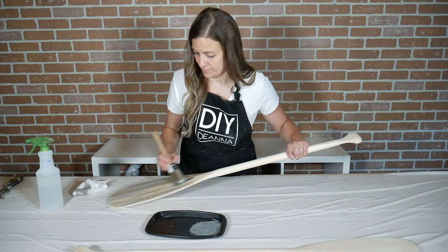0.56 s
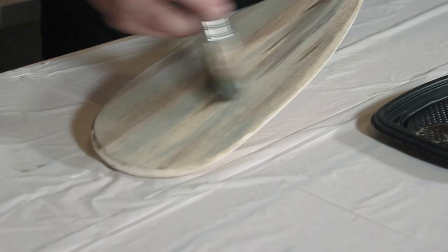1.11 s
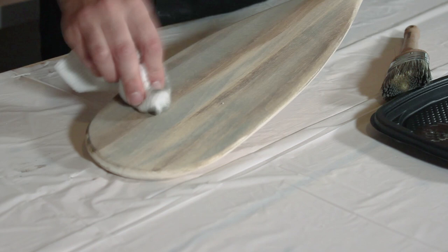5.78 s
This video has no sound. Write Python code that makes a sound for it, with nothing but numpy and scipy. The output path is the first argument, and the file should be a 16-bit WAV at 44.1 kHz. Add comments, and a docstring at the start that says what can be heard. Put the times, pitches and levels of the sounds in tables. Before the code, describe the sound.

In a quiet hard-walled room with a low air hum, a bristle brush makes short, faint swishes on a thin wooden board. The handle is put down with one sharp, loud wooden clack, followed by tiny ticks and low table rumble, and a firm thump comes a second later. A rag then wipes the board in quick, overlapping scratchy strokes until the end. Close microphone, nearly mono.

```python
"""A bristle brush, and later a rag, rub a thin wooden board: dense random slips excite its resonances.
The brush handle clacks on the table, the board bumps it, and small hard things tick: short contact
forces drive decaying sines. The table rocks with lumpy low noise, and air hums under a faint hiss.
A hard-walled room adds a noise-like tail; a faint unlike part separates two nearly equal channels."""
import sys
import numpy as np
from scipy import signal
from scipy.fft import rfft, irfft
from scipy.io import wavfile
from scipy.ndimage import uniform_filter1d

SR = 44100
rng = np.random.default_rng(int(sys.argv[2]) if len(sys.argv) > 2 else 0)


def wav_record(signal):
    """Record a signal, one row per channel, as 16-bit PCM in the file named by sys.argv[1]."""
    frames = np.transpose(np.atleast_2d(signal))
    bounded = np.clip(frames, -1, 1)
    # unit amplitude maps onto the largest positive 16-bit level
    quanta = np.round(bounded * 32767).astype(np.int16)
    wavfile.write(sys.argv[1], SR, quanta)


N = 326781

# spectrum of the air hum: f/Hz, relative level per Hz/dB
AIR_COLOUR = [(12, -26), (20, -2.5), (172, -5), (301, -10.5), (367, -16), (485, -8.5), (624, -20),
              (849, -17), (923, -16.5), (1220, -21.5), (1330, -19), (1440, -23), (6910, -34.5),
              (13200, -34.5), (16000, -44)]
# resonances added to the air hum: f/Hz, width/Hz, height/dB
AIR_MODES = [(110, 4.7, 6.5), (168, 9.5, 5.5), (289, 26, 3), (459, 120, -0.5), (926, 40, 5)]
# spectrum of the hiss: f/Hz, relative level per Hz/dB
HISS_COLOUR = [(12, -33), (20, 5), (43, -25.5), (150, 2), (193, -14), (285, -4.5), (558, -6.5),
               (1260, -11.5), (7520, -13.5), (16000, -15.5)]
# brush strokes: t of top speed/s, length/s, scratch level/dB, extra bristle hiss/dB, extra board body/dB
BRUSH_STROKES = [(0.09, 0.25, -74.5, 6.5, 7.5), (0.29, 0.39, -75, 5, 8.5), (0.705, 0.15, -71.5, 2.5, -7),
                 (1.145, 0.34, -68, -1, -6), (1.641, 0.22, -69.5, -4.5, -4), (1.994, 0.18, -61, -4, -13),
                 (2.28, 0.2, -63.5, -1.5, -5.5), (2.516, 0.18, -74.5, 0, 6)]
# spectrum of the brush scratch: f/Hz, relative level per Hz/dB
BRUSH_COLOUR = [(290, -26), (500, 2), (988, -6), (1320, -4.5), (1980, -11), (2130, -2.5), (2330, -7.5),
                (4400, -13), (6610, -13.5), (12300, -12.5), (16000, -22)]
# resonances of the board: f/Hz, width/Hz, height before the source's ring factor/dB
BOARD = [(920, 210, 0.5), (1420, 48, 8), (2280, 240, 4), (2990, 210, 2.5), (3224, 230, 3.5),
         (3744, 150, 4.5), (4346, 130, 5.5)]
# frequency response of the unlike part: f/Hz, side minus mid level before source weights/dB
WIDTH = [(60, -33.5), (200, -31.5), (700, -23.5), (1300, -24.5), (2400, -21), (4400, -18), (8100, -16.5),
         (15000, -14)]
# decay of the room: f/Hz, t60/s
ROOM_DECAY = [(100, 0.25), (250, 0.26), (500, 0.45), (1000, 0.41), (2000, 0.6), (4000, 0.43), (8000, 0.6),
              (15000, 0.066)]
# small hard things touching: t/s, peak level/dB, low ring f/Hz, high ring f/Hz,
# high ring level relative to low/dB, t60 before a cap/s
TICKS = [(2.678, -55, 2540, 4100, 11, 0.017), (2.829, -48, 1720, 3030, -6, 0.012),
         (2.844, -30.5, 1406, 2410, -4, 0.01), (3.1796, -33, 1280, 3950, 0, 0.0069),
         (3.2531, -32, 1706, 3400, -15, 0.0048), (7.0023, -39, 1330, 2160, -6, 0.019)]
# rocking of the table: t of top/s, swelling time/s, fading time/s, level at top/dB
SHAKE = [(2.83, 0.02, 0.054, -48), (2.895, .04, .12, -45.5), (3.035, .05, 0.17, -52),
         (3.264, 0.035, 0.021, -53.5), (3.335, 0.029, 0.16, -52), (3.874, 0.04, .12, -65.5),
         (4.305, 0.11, 0.028, -55.5), (6.9, 0.14, .2, -60), (7.17, .06, .05, -54.5),
         (7.3, 0.096, 0.07, -54.5)]
# spectrum of the rocking: f/Hz, relative level/dB
SHAKE_COLOUR = [(15, -27.5), (30, 2.5), (62, -3), (90, 3), (150, -41.0), (400, -54)]
# board bumping the table: t/s, swing peak level/dB, contact time/ms, room send relative to the bump/dB
BUMPS = [(2.831, -49, 1.33, 13.5), (3.334, -43, 2.5, 5), (3.3872, -28.5, 1.52, -3), (3.8701, -13, 1.7, -5)]
# modes of the table top: f/Hz, level relative to the swing peak/dB, t60/s
TABLE = [(110.7, -24.5, 0.55), (206, -14.5, 0.1), (325, -8, 0.074), (567, -23, 0.033), (782, -14.5, 0.33)]
# repeats of each bump through the table top: delay/ms, relative level/dB
ECHOES = [(4.8, -11), (6.6, -14.5), (9.6, -5.5), (13.2, -21.5), (16.5, -22), (21.0, -12.5)]
# handle dropped on the table: t/s, peak level/dB, room level before a 21 dB lift/dB
CLACK = (2.8853, -0.35, -11)
# modes of the handle: f/Hz, relative level/dB, t60/s
HANDLE = [(180, -34, 0.019), (280.7, -19.5, 0.027), (486, -9, 0.03), (670, -2, 0.018), (970, -7.5, 0.024),
          (1148, -3, 0.018), (1836, -11, 0.022), (2130, -12, 0.019), (3290, -7.5, 0.019), (4100, -10, .011)]
# spectrum of the splintery crack: f/Hz, relative level/dB
CRACK = [(300, -27), (1000, -18), (2600, -7), (3700, 5), (4600, -14.5), (6500, -12.5), (9000, -25.5),
         (12000, -30.5), (16000, -33.5)]
# what the clack leaves in the room: f/Hz, relative level per Hz/dB
CRASH = [(50, -36.5), (90, -19.5), (180, -4.5), (390, -10.5), (780, -2), (950, -2), (1400, -7.5),
         (2100, -15.5), (2750, -24), (3300, -18.5), (4200, -18.5), (4800, -30), (7000, -34.5),
         (10700, -45.5), (16000, -64.5)]
# the rag drops onto the board: t of top speed/s, speeding up/s, slowing down/s, scratch level/dB, brightness/dB
RAG_LANDS = (3.395, .03, .045, -66, 3)
# rag wipes: t of top speed/s, speeding up/s, slowing down/s, scratch level/dB, brightness/dB
RAG_WIPES = [(3.84, 0.14, 0.056, -56, 0), (3.98, 0.12, .1, -58, -0.5), (4.13, 0.053, .12, -58.5, -1),
             (4.39, 0.15, 0.11, -57.5, -1), (4.62, .11, .13, -56.5, 0), (4.87, .11, 0.16, -58.5, -1),
             (5.12, 0.085, 0.18, -59, -0.5), (5.57, .15, .12, -59.5, 0.5), (5.785, 0.076, 0.14, -60, 2),
             (6.03, 0.042, 0.043, -67.5, -0.5), (6.15, 0.063, 0.058, -62, 3), (6.36, 0.13, .15, -59.5, -1),
             (6.53, .13, 0.073, -60.5, 0.5), (6.78, 0.048, 0.053, -62, 1),
             (6.905, 0.063, 0.062, -60.5, -1.5), (7.03, .045, 0.1, -58, -3.5),
             (7.195, 0.053, 0.1, -59, -0.5), (7.29, 0.064, 0.05, -62.5, 10), (7.37, .05, .12, -70, 4)]
# spectrum of the rag scratch: f/Hz, relative level per Hz/dB
RAG_COLOUR = [(290, -48), (500, -11), (718, -7.5), (784, -6.5), (1320, -2), (1670, -2), (3150, -5),
              (5310, -10.5), (12100, -15.5), (14900, -21), (16000, -34)]


def gain_of(db):
    """Definition of the decibel: amplitude ratio from a level."""
    return 10 ** (np.asarray(db) / 20)


def evened(x):
    """Normalization to unit root mean square."""
    return x / np.sqrt(np.mean(np.abs(x) ** 2) + 1e-20)


def read(points, hz):
    """Linear interpolation along a logarithmic frequency axis."""
    f, value = np.transpose(points)
    return np.interp(np.log(hz + 1), np.log(f + 1), value)


def peaked(modes, hz):
    """Resonance: bell-shaped level peaks in dB, summed over the modes."""
    return sum(db / (1 + (2 * (hz - f) / width) ** 2) for f, width, db in modes)


def filtered(x, points):
    """Zero-phase filtering: a real gain multiplies the spectrum."""
    hz = np.fft.rfftfreq(len(x), 1 / SR)
    return irfft(rfft(x) * gain_of(read(points, hz)), len(x))


def add(mix, s, sound):
    """Linear superposition of a sound at a given time in seconds."""
    part = mix[round(s * SR):][:len(sound)]
    part += sound[:len(part)]


def rings(modes, length_s):
    """Modal decay: a struck body sums exponentially dying sines."""
    t = np.arange(round(length_s * SR)) / SR
    return sum(gain_of(db - 60 * t / t60) * np.sin(2 * np.pi * hz * t) for hz, db, t60 in modes)


def arches(rows, sharp):
    """Amplitude envelopes: a quarter sine up to each top and one down, raised to a power."""
    t = np.arange(N) / SR
    curves = []
    for s, rise, fall, db in rows:
        phase = np.interp(t, [s - rise, s, s + fall], [0, 1, 0])
        curves.append(gain_of(db) * np.sin(np.pi / 2 * phase) ** sharp)
    return np.array(curves)


def drifting_patches(shape, frames):
    """Random spectral modulation, smoothed over three bins and some frames, of unit rms."""
    across_bins = uniform_filter1d(rng.standard_normal(shape), 3, 0)
    return evened(uniform_filter1d(across_bins, frames, 1))


def steady(points, modes, level_db, patchy_db):
    """Filtered stationary noise whose spectrum drifts in patches."""
    hz, _, z = signal.stft(rng.standard_normal(N + 2048), SR, nperseg=4096, noverlap=3072)
    colour_db = read(points, hz) + peaked(modes, hz)
    z = z * gain_of(colour_db[:, None] + patchy_db * drifting_patches(z.shape, 6))
    noise = signal.istft(z, SR, nperseg=4096, noverlap=3072)[1][:N]
    return gain_of(level_db) * evened(noise)


def air():
    """Broadband noise weighted to the bass, with resonances, heard as a low hum of air."""
    return steady(AIR_COLOUR, AIR_MODES, level_db=-59, patchy_db=1.2)


def hiss():
    """Broadband noise of its own spectrum, independent of the air hum."""
    return steady(HISS_COLOUR, [], level_db=-79, patchy_db=1.2)


def rub(speeds, hiss_db, body_db, late_body_db, slow_dull, ring, colour, low_hz, high_hz, body_hz,
        slips_per_s, spread_db, patchy_db):
    """Frictional excitation: fibres slip over the grain in dense tiny clicks that ring the board."""
    slips = (rng.random(N) < slips_per_s / SR) * rng.standard_normal(N)
    slips = slips * gain_of(spread_db * np.minimum(rng.exponential(1, N), 4))
    clumps = evened(uniform_filter1d(rng.standard_normal(N), 200))
    slips *= gain_of(0.5 * clumps)  # the grain catches in clumps

    power = speeds ** 2
    hz, t, z = signal.stft(evened(slips) * np.sqrt(power.sum(0)), SR, nperseg=512, noverlap=384)
    at = np.minimum((t * SR).astype(int), N - 1)
    share = power[:, at]
    share = share / (share.sum(0) + 1e-30)  # which stroke rules each moment
    progress = np.cumsum(power, 1) / power.sum(1)[:, None] - .5  # -0.5 to 0.5 along each stroke
    way = (share * progress[:, at]).sum(0)
    relative_power = power / power.max(1)[:, None]
    slow_db = 10 * np.log10((share * relative_power[:, at]).sum(0) + .01)  # below top speed

    high = 1 / (1 + (6200 / (hz + 1)) ** 6)  # share of the fibre hiss
    low = 1 / (1 + (hz / body_hz) ** 6)  # share of the board body
    colour_db = read(colour, hz) + ring * peaked(BOARD, hz)
    patches_db = patchy_db * drifting_patches(z.shape, 26) * (1 - high[:, None])
    shape = gain_of(colour_db[:, None] + patches_db)
    band = shape[(hz > low_hz) & (hz < high_hz)]
    shape /= np.sqrt(np.sum(band ** 2, 0).mean() / len(hz))  # rms 1 in the scratch band

    # each stroke has its own colour
    fibre_db = np.outer(high, hiss_db @ share + slow_dull * slow_db)
    board_db = np.outer(low, body_db @ share + late_body_db * way)
    return signal.istft(z * shape * gain_of(fibre_db + board_db), SR, nperseg=512, noverlap=384)[1][:N]


def brush():
    """Bristle friction: all strokes share one speed shape, stretched to their length."""
    s, length, db, hiss_db, body_db = np.transpose(BRUSH_STROKES)
    rise = 0.48  # share of a stroke spent speeding up
    speeds = arches(zip(s, rise * length, (1 - rise) * length, db), sharp=1.77)
    return rub(speeds, hiss_db, body_db,
               late_body_db=2,  # the board body grows along a stroke as the hand bears down
               slow_dull=.15,  # hiss dB lost per dB below top speed
               ring=1.3,  # how freely the board rings
               colour=BRUSH_COLOUR, low_hz=2470, high_hz=3900, body_hz=1460,
               slips_per_s=9000, spread_db=2.2, patchy_db=2.9)


def room(x):
    """Reverberation: sparse random-sign taps swell, then each band decays at its own rate."""
    taps = np.zeros(SR)
    count = (SR - 151) // 10
    places = np.arange(140, SR - 20, 10) + rng.integers(0, 10, count)
    taps[places] = rng.choice([-1., 1.], count)
    taps *= 1 - np.exp(-np.arange(SR) / SR / 0.0018)
    hz, t, z = signal.stft(taps, SR, nperseg=256)
    decay = gain_of(-60 * t / read(ROOM_DECAY, hz)[:, None])
    tail = signal.istft(z * decay, SR, nperseg=256)[1]
    tail[:130] = 0
    return signal.fftconvolve(x, tail / np.linalg.norm(tail))[:N]


def tick(low_hz, high_hz, high_db, t60):
    """Hard light impact: two short modal rings with a rounded start, peak 1."""
    sound = -rings([(low_hz, 0, min(t60, .02)), (high_hz, high_db, 0.87 * min(t60, .03))], .05)
    sound *= 1 - np.exp(-(np.arange(len(sound)) / SR / 0.00012) ** 2)
    return sound / np.abs(sound).max()


def shake():
    """Amplitude-modulated low-frequency noise: the table rocks under the hands."""
    low = filtered(rng.standard_normal(N), SHAKE_COLOUR)
    return evened(low) * np.sqrt((arches(SHAKE, sharp=1.7) ** 2).sum(0))


def bump(contact_ms):
    """Soft impact: one radiated swing, suction then a larger push, excites the table-top modes."""
    u = np.arange(round(.004 * contact_ms * SR)) / SR / (0.0011 * contact_ms) - .7
    force = np.exp(-(u / 0.31) ** 2)
    swing = -np.gradient(force) + 0.006 * force
    sound = np.convolve(force / force.sum(), -rings(TABLE, 0.39))
    add(sound, 0, swing / np.abs(swing).max())
    return sound


def table_echoes(soft):
    """Delayed superposition: the table top passes each bump on."""
    echoes = np.zeros(N)
    for ms, db in ECHOES:
        add(echoes, ms / 1000, gain_of(db) * soft)
    return echoes


def clack():
    """Hard impact: a short contact force excites the handle modes, with a splintery crack in its first 3 ms."""
    force = signal.windows.hann(7)
    body = np.convolve(force / force.sum(), -rings(HANDLE, .08))
    t = np.arange(1024) / SR
    crack = evened(filtered(rng.standard_normal(1024), CRACK))
    crack = crack * np.exp(-(t / 0.0022) ** 2) * (1 - np.exp(-t / .0001))
    add(body, 0, gain_of(-4) * crack)
    body = signal.lfilter(*signal.butter(2, 130, "high", fs=SR), body)  # a small handle radiates no deep bass
    return body / np.abs(body).max()


def crash(s):
    """Impulse excitation of the room: a coloured impulse of unit energy at the clack."""
    impulse = np.zeros(N)
    impulse[round(s * SR)] = 1
    coloured = filtered(impulse, CRASH)
    return coloured / np.linalg.norm(coloured)


def rag():
    """Cloth friction: a brighter wipe hisses more and stirs the board less."""
    rows = np.array([RAG_LANDS, *RAG_WIPES])
    bright_db = rows[:, -1]
    speeds = arches(rows[:, :-1], sharp=0.79)
    return rub(speeds, bright_db,
               body_db=-0.79 * bright_db,  # body dB lost per dB of brightness
               late_body_db=0,
               slow_dull=0.17,  # hiss dB lost per dB below top speed
               ring=0.94,  # how freely the board rings
               colour=RAG_COLOUR, low_hz=3155, high_hz=7700, body_hz=1610,
               slips_per_s=9000, spread_db=0.6, patchy_db=2.3)


def scene():
    """Superposition of direct sound, echoes and reverberation, with a faint unlike part in the two channels."""
    hard, soft, sent = np.zeros((3, N))  # sent: what excites the room
    for s, db, *colour in TICKS:
        add(hard, s, gain_of(db) * tick(*colour))
    sent += gain_of(-10) * hard
    for s, db, contact_ms, room_db in BUMPS:
        sound = bump(contact_ms)
        add(soft, s, gain_of(db) * sound)
        add(sent, s, gain_of(db + room_db) * sound)
    s, db, room_db = CLACK
    add(hard, s, gain_of(db) * clack())
    sent += gain_of(room_db + 21.0) * crash(s)

    strokes = brush() + rag()
    near = hard + soft + strokes + table_echoes(soft)
    far = sent + gain_of(-13.0) * strokes
    mid = near + room(far) + air() + shake()
    quadrature = signal.hilbert(strokes + .4 * (hard + soft)).imag  # every sine turned by 90 degrees
    side = filtered(.4 * room(far) + quadrature, WIDTH) + hiss()  # this room has its own random taps
    return np.array([mid + side, mid - side])


def top_cut(x):
    """Nothing passes above the cut-off."""
    return signal.sosfilt(signal.butter(12, 16620, fs=SR, output="sos"), x)


def record(dry):
    """Band limitation: a linear-phase low-pass removes the extreme treble."""
    edge = signal.firwin(255, 15750, window=("kaiser", 7), fs=SR)  # cutoff in Hz
    mix = signal.oaconvolve(dry, edge[None], "same")
    return top_cut(mix)


dry = scene()
out = record(dry)
wav_record(out)
```